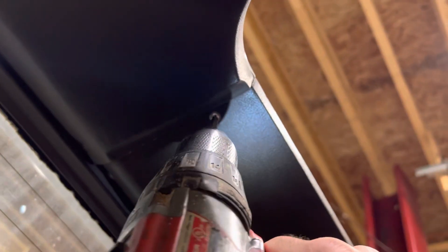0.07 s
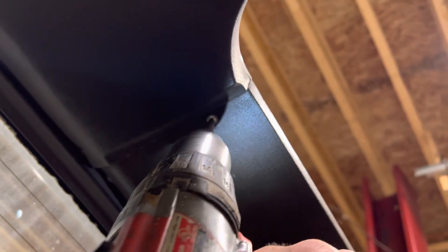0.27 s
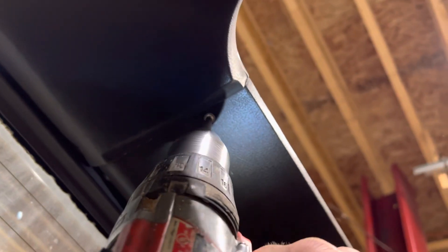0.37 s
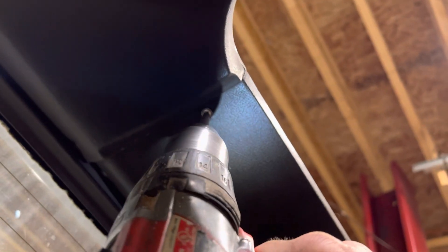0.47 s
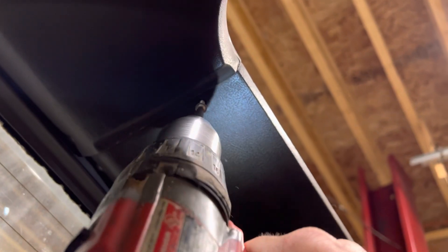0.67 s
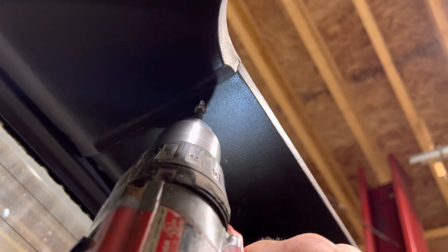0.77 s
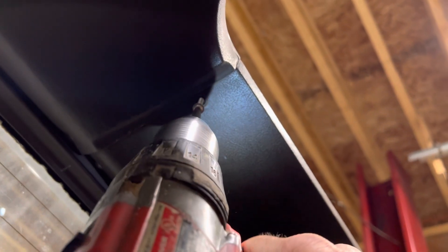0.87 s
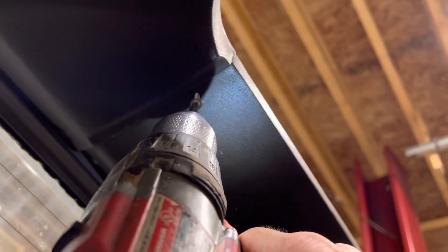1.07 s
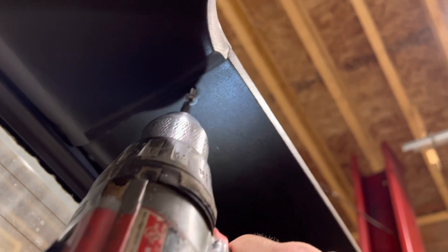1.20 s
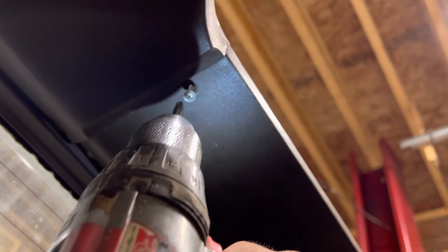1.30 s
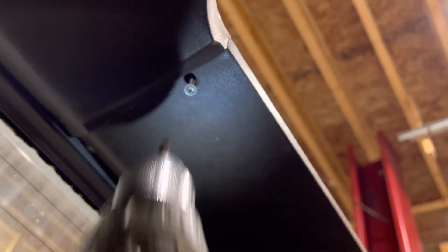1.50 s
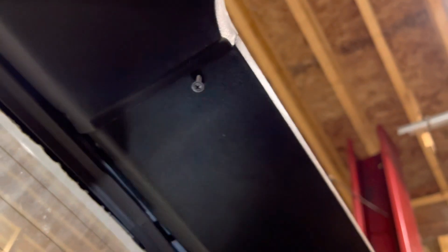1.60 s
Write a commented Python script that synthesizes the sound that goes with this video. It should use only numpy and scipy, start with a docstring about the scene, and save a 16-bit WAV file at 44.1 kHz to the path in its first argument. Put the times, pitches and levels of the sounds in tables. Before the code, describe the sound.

A cordless drill close to the microphone clicks, jerks into a rising whine and harsh gear rattle, a screw squeaks and groans loose, then the motor brakes with a sharp metallic clatter in a quiet garage.

```python
"""A cordless drill, close to a phone in a garage, backs a screw out of a plastic trim panel.
The trigger clicks, the gears jerk into a whine and rattle, and the screw squeaks and groans loose.
The brake stops the motor with a clatter of the spindle lock; later the bit ticks off the screw head.
Whine and groans are sums of sines, rattle and knocks are filtered noise, the chuck is decaying modes.
A low throb of handling, faint air noise and a short room tail lie around the drill."""
import sys
import numpy as np
from scipy import signal
from scipy.fft import rfft, irfft
from scipy.io import wavfile
from scipy.ndimage import uniform_filter1d

SR = 44100
rng = np.random.default_rng(int(sys.argv[2]) if len(sys.argv) > 2 else 0)


def master_out(mix):
    """Clip the mix to full scale and print it as 16-bit PCM to the path in sys.argv[1]."""
    frames = np.transpose(np.atleast_2d(mix))
    ceiling = np.clip(frames, -1, 1)
    pcm = np.round(ceiling * 32767).astype(np.int16)
    wavfile.write(sys.argv[1], SR, pcm)


N = 72765  # length [samples]
TIME = np.arange(N) / SR  # [s]
BIN_HZ = np.arange(N + 1) * SR / (2 * N)  # bins of a spectrum padded to 2 N samples


def undb(db):
    """Turn decibels into an amplitude factor."""
    return 10 ** (np.asarray(db) / 20)


def unit(x):
    """Scale to an RMS of 1."""
    return x / np.sqrt(np.mean(x ** 2))


def curve(table, axis=1):
    """A column of a table, joined by straight lines in time."""
    rows = np.array(table)
    return np.interp(TIME, rows[:, 0], rows[:, axis])


def per_bin(points):
    """A table joined by straight lines over log frequency."""
    rows = np.array(points)
    return np.interp(np.log(BIN_HZ + 1), np.log(rows[:, 0]), rows[:, 1])


def colour(x, points):
    """Causal minimum-phase filter of unit power with the given spectrum."""
    cepstrum = irfft(np.log(unit(undb(per_bin(points)))))
    # Folding the cepstrum forward in time makes the filter causal
    cepstrum[1:N] *= 2
    cepstrum[N + 1:] = 0
    response = np.exp(rfft(cepstrum))
    return irfft(rfft(x, 2 * N) * response)[..., :N]


def walk(rate):
    """Smooth random wander of spread 1: noise averaged twice over 1 / rate seconds."""
    width = max(int(SR / rate), 1)
    once = uniform_filter1d(rng.standard_normal(N), width, mode="wrap")
    return unit(uniform_filter1d(once, width, mode="wrap"))


# Likeness of the left and right noise, by frequency: (frequency [Hz], correlation [0 to 1])
STEREO_LIKENESS = [(60, 1), (900, 0.35), (1500, 0.19), (2800, 0.23), (6500, 0.35), (8200, 0.5)]


def partly_alike(pair):
    """Two unrelated signals become partly alike, left and right."""
    first, second = rfft(pair, 2 * N)
    likeness = np.clip(per_bin(STEREO_LIKENESS), 0, 1)
    mixed = likeness * first + np.sqrt(1 - likeness ** 2) * second
    return irfft(np.array([first, mixed]))[:, :N]


def noise():
    """White noise, partly alike left and right."""
    return partly_alike(rng.standard_normal((2, N)))


def blows(rows, points):
    """Sudden noise bursts that die away exponentially, in the colour of the struck part."""
    envelope = 0
    for start, db, decay in rows:
        age = np.maximum(TIME - start, 0)
        envelope = envelope + undb(db) * (TIME >= start) * np.exp(-age / decay)
    return colour(noise() * envelope, points)


# Strength of the handling throb and rustle: (time [s], level [dB])
HANDLING_LEVEL = [(0, -25), (.04, -37), (.2, -35.5), (.99, -41), (1.07, -55.5), (1.45, -53.5), (1.65, -55)]
# Spectrum of the rustle: (frequency [Hz], relative level [dB per Hz])
RUSTLE_SPECTRUM = [(30, -24), (60, -3.5), (110, -13), (250, -21.5), (600, -35.5), (1500, -36),
                   (3000, -57.5), (8000, -65.5)]
THROB_HZ, THROB_WANDER, RUSTLE_DB = 57.25, 0.1, -5  # wander as a share of pitch; dB before the level curve


def handling():
    """A wavering low tone and filtered rustle, strongest at the start and weaker after about a second."""
    throb_hz = THROB_HZ * (1 + THROB_WANDER * walk(30))
    throb = np.sqrt(2) * np.sin(2 * np.pi * np.cumsum(throb_hz) / SR)
    rustle = undb(RUSTLE_DB) * colour(noise(), RUSTLE_SPECTRUM)
    return (throb + rustle) * undb(curve(HANDLING_LEVEL))


# Spectrum of the steady air noise: (frequency [Hz], relative level [dB per Hz])
AIR_SPECTRUM = [(30, -6.5), (100, -1), (800, -10.5), (1500, -12.5), (2500, -28.5), (4000, -37.5),
                (6000, -30.5), (15000, -58.5)]
AIR_DB = -62.5


def air():
    """Faint steady noise behind everything, mostly low."""
    return undb(AIR_DB) * colour(noise(), AIR_SPECTRUM)


# Small hard clicks of trigger, spindle lock and bit: (time [s], level before filter [dB], decay [s])
CLICK_BLOWS = [(.132, -41, 0.004), (.1355, -45, 0.0042), (.1463, -25, 0.0035), (.152, -47.5, 0.037),
               (.1955, -22, .004), (.9185, -8, 0.0028), (.9243, -15.5, 0.0016), (.9283, -19, 0.0029),
               (.9738, -27, 0.0032), (1.4708, -45.5, 0.0041)]
# Spectrum of a click: (frequency [Hz], relative level [dB per Hz])
CLICK_SPECTRUM = [(200, -17), (1100, -2.5), (1800, -3.5), (2800, -10.5), (4200, -0.5), (6200, 6.5),
                  (12000, -14.5), (15800, -15)]


def clicks():
    """Small hard parts strike each other: short bright noise bursts."""
    return blows(CLICK_BLOWS, CLICK_SPECTRUM)


# Resonances of the drill housing: (centre [Hz], width [Hz], lift of passing tones [dB],
# ring to rattle and knocks [dB])
HOUSING_MODES = [(712, 50, 5, 4.5), (955, 400, 10, -18), (1619, 270, 12, 3), (2773, 330, 12.5, 2.5)]
# Tones of the motor, before lift and effort: (multiple of the fundamental, level [dB])
MOTOR_ORDERS = [(1, -31), (2, -41.5), (3, -34), (4, -22)]
# Lower tones of the gear train, before lift and effort: (fraction of the fundamental, level [dB])
GEAR_TONES = [(.395, -41.5), (.5, -36.5), (.79, -42.5)]
# Effort of the drive, which also sets rattle and rumble:
# (time [s], gear rattle [dB], whine [dB], panel rumble [dB]), each added to its source's own level
DRIVE_EFFORT = [(.195, -4.5, -26.5, -11.5), (.24, 4, -11, 0.5), (.34, -1.5, -4.5, 5), (.5, 2, -5, -0.5),
                (.66, 2, -3.5, 1.5), (.72, 1, -2.5, -9.5), (.78, 1, -3.5, -10), (.88, -2.5, -9.5, -25),
                (.915, 0.5, -15.5, -24)]
MOTOR_FLUTTER_DB, GEAR_FLUTTER_DB = 1.5, 5.5  # spread


def whine(hz):
    """Motor and gear tones; each swells as it crosses a housing resonance."""
    out, turns = 0, np.cumsum(hz) / SR
    motor = [(round(order), db, MOTOR_FLUTTER_DB) for order, db in MOTOR_ORDERS]
    gears = [(order, db, GEAR_FLUTTER_DB) for order, db in GEAR_TONES]
    for order, db, flutter_db in motor + gears:
        lift_db = 0
        for centre, width, lift, _ in HOUSING_MODES:
            lift_db = lift_db + lift / (1 + (2 * (order * hz - centre) / width) ** 2)
        level = undb(db + lift_db + flutter_db * walk(43.0))
        out = out + level * np.sin(2 * np.pi * (order * turns + rng.random()))
    return np.sqrt(2) * out * undb(curve(DRIVE_EFFORT, axis=2))


def resonances(x):
    """The shell of the drill rings on at its resonances."""
    out = 0
    for hz, width, _, db in HOUSING_MODES:
        b, a = signal.iirpeak(hz, hz / width, fs=SR)
        out = out + undb(db) * signal.lfilter(b, a, x)
    return out


def housing(x):
    """Sound from inside the drill, direct and through the ringing shell."""
    return x + resonances(x)


# Spectrum of the gear rattle, before the housing: (frequency [Hz], relative level [dB per Hz])
RATTLE_SPECTRUM = [(150, -5.5), (700, -7.5), (1200, -10), (2300, -15), (2900, -10), (4050, -1.5),
                   (4600, 1.5), (6000, 5.5), (7300, 2.5), (9000, -7), (12000, -17), (15800, -26.5)]
RATTLE_DB = -17  # before effort and housing
TOOTH_RATE, TOOTH_SCATTER_DB = 4000, 1.5  # mean impacts per second, spread of their strength
HISS_SHARE = 0.71  # amplitude beside the teeth


def rattle():
    """Dense, irregular tooth impacts and fan hiss, heard through the housing."""
    strength = undb(TOOTH_SCATTER_DB * rng.standard_normal(N))
    hits = (rng.random(N) < TOOTH_RATE / SR) * strength
    teeth = unit(hits * rng.choice([-1, 1], (2, N)))
    drive = unit(teeth + HISS_SHARE * rng.standard_normal((2, N)))
    coloured = colour(partly_alike(drive), RATTLE_SPECTRUM)
    return housing(coloured) * undb(RATTLE_DB + curve(DRIVE_EFFORT))


# Spectrum of the driven panel's rumble: (frequency [Hz], relative level [dB per Hz])
PANEL_SPECTRUM = [(25, -33.5), (52, 9), (115, 0.5), (190, 3), (500, -13.5), (1000, -42.5)]
PANEL_DB = -24  # before effort


def panel_rumble():
    """Low noise of the plastic panel, shaken through the screw."""
    return colour(noise(), PANEL_SPECTRUM) * undb(PANEL_DB + curve(DRIVE_EFFORT, axis=3))


# Motor speed, before wobble: (time [s], fundamental of the whine [Hz])
MOTOR_SPEED = [(.19, 171.2), (.235, 520.9), (.295, 640.8), (.35, 693.4), (.40, 723.6), (.475, 765),
               (.57, 870), (.62, 901.7), (.69, 908.7), (.745, 923.8), (.785, 941.5), (.836, 916), (.9, 858),
               (.93, 615)]
WOBBLE = .0015  # spread as a share of the speed
START_S, ATTACK_S, BRAKE_S, RELEASE_S = 0.1916, 0.0023, .918, 0.004


def drill():
    """The motor runs from trigger to brake and shakes the panel through the screw."""
    hz = curve(MOTOR_SPEED) * (1 + WOBBLE * walk(60))
    attack = np.clip((TIME - START_S) / ATTACK_S, 0, 1)
    release = np.exp(-np.maximum(TIME - BRAKE_S, 0) / RELEASE_S)
    return attack * release * (whine(hz) + rattle() + panel_rumble())


# Squeaks and groans of the slipping screw, before jitter and flutter:
# (start [s], length [s], first slip rate [Hz], last slip rate [Hz], level [dB])
SCREW_GROANS = [(.199, 0.041, 2893, 2662, -22), (0.232, 0.026, 2764, 2740, -19.5),
                (0.22, .025, 1608, 1640, -29.5), (.283, .05, 296, 280, -16.5),
                (.299, .016, 346, 199.3, -9.5), (.308, .04, 198.3, 84, -9),
                (0.75, 0.042, 200, 59.13, -17.5)]
GROAN_OVERTONE = 0.2  # amplitude beside the fundamental
GROAN_JITTER_HZ, GROAN_FLUTTER_DB = 24, 2.5  # spreads


def screw():
    """The thread slips in the plastic: high squeaks, then short falling groans."""
    out = 0
    for start, length, first_hz, last_hz, db in SCREW_GROANS:
        progress = np.clip((TIME - start) / length, 0, 1)
        hz = first_hz * (last_hz / first_hz) ** progress + GROAN_JITTER_HZ * walk(170)
        phase = 2 * np.pi * np.cumsum(hz * (TIME >= start)) / SR
        swell = np.sqrt(np.abs(np.sin(np.pi * progress)))
        tone = np.sin(phase) + GROAN_OVERTONE * np.sin(2 * phase)
        out = out + undb(db + GROAN_FLUTTER_DB * walk(240)) * swell * tone
    return out


# Knocks as the gears take up and brake and the bit lifts off:
# (time [s], level before filter and housing [dB], decay [s])
KNOCK_BLOWS = [(.2045, -14, 0.021), (.296, -16, 0.012), (.896, -17.5, 0.0037), (.9, -16.5, 0.0014),
               (.904, -16, 0.0014), (.9095, -16.5, 0.0052), (.9195, -20, 0.0023), (.925, -17, 0.00086),
               (.9283, -22.5, 0.0048), (1.4715, -60.5, 0.0051)]
# Spectrum of a knock, before the housing: (frequency [Hz], relative level [dB per Hz])
KNOCK_SPECTRUM = [(100, -16), (300, -2.5), (1500, -5.5), (2200, -10), (2750, -6), (3500, -7.5),
                  (15000, -44.5)]


def knocks():
    """The gear train and bit knock: noise bursts heard through the ringing housing."""
    return housing(blows(KNOCK_BLOWS, KNOCK_SPECTRUM))


# Blows of the spindle lock that ring the chuck: (time [s], level [dB])
LOCK_BLOWS = [(0.9201, -14.5), (0.923, -24)]
# Modes of the steel chuck: (frequency [Hz], level relative to the blow [dB], time to fall 60 dB [s])
CHUCK_MODES = [(6046, 5, 0.045), (6070, -0.5, 0.071), (6140, -23, 0.39)]


def chuck():
    """The steel chuck rings in decaying sines when the spindle lock catches it."""
    out = 0
    for start, blow_db in LOCK_BLOWS:
        age = np.maximum(TIME - start, 0)
        for hz, db, t60 in CHUCK_MODES:
            level = (age > 0) * undb(blow_db + db) * np.exp(-np.log(1000) * age / t60)
            out = out + level * np.sin(2 * np.pi * (hz * age + rng.random()))
    return out


# Spectrum of the settling bump: (frequency [Hz], relative level [dB per Hz])
SETTLE_SPECTRUM = [(100, -22.5), (720, -13.5), (1100, -21.5), (1700, -15), (2600, -45), (6000, -60)]
SETTLE_S, SETTLE_DB, SETTLE_DECAY_S = .9405, -23.5, 0.0082  # level before the filter


def settle():
    """The drill settles with one dull, low noise burst."""
    return blows([(SETTLE_S, SETTLE_DB, SETTLE_DECAY_S)], SETTLE_SPECTRUM)


ROOM_DB, ROOM_T60_S, ROOM_HIGH_T60_S = -23.5, 0.65, 0.36


def garage(x):
    """A short diffuse tail of the garage whose treble dies sooner."""
    scatter = rng.standard_normal((2, N))
    low = signal.sosfilt(signal.butter(2, 1800, fs=SR, output="sos"), scatter)
    low_tail = low * np.exp(-np.log(1000) * TIME / ROOM_T60_S)
    high_tail = (scatter - low) * np.exp(-np.log(1000) * TIME / ROOM_HIGH_T60_S)
    build_up = np.minimum(TIME / .008, 1)
    tail = unit((low_tail + high_tail) * build_up) / np.sqrt(N)  # unit energy
    return undb(ROOM_DB) * signal.fftconvolve(x, tail, axes=1)[:, :N]


# Shading of the right microphone port from the drill: (frequency [Hz], gain [dB])
PORT_SHADE = [(60, -2.5), (900, -4), (1300, -9), (2800, -2.5), (3800, -2), (5000, -10.5), (7000, -17),
              (8000, 2), (15000, -2)]
PORT_LAG_S = .00004  # fades out above about 6.5 kHz


def right_port(x):
    """The port shaded from the drill: weaker in most bands, and later below the top treble."""
    lag_s = PORT_LAG_S / (1 + (BIN_HZ / 6500) ** 8)
    lag = np.exp(-2j * np.pi * BIN_HZ * lag_s)
    return irfft(rfft(x, 2 * N) * undb(per_bin(PORT_SHADE)) * lag)[:N]


def scene():
    """The drill and its garage tail, left and right, with handling and air noise around them."""
    near = clicks() + drill() + screw() + knocks() + chuck() + settle()
    left, right = near + garage(near)
    return np.array([left, right_port(right)]) + handling() + air()


LOW_CUT_HZ, TOP_HZ = 46, 15900
CEILING = .96  # amplitude that rounded peaks approach


def record(dry):
    """The phone cuts the deepest bass, rounds the highest peaks and cuts the top."""
    thin = signal.sosfilt(signal.butter(4, LOW_CUT_HZ, "high", fs=SR, output="sos"), dry)
    rounded = thin / (1 + (thin / CEILING) ** 8) ** (1 / 8)
    return signal.sosfilt(signal.ellip(10, .2, 90, TOP_HZ, fs=SR, output="sos"), rounded)


dry = scene()
out = record(dry)
master_out(out)
```